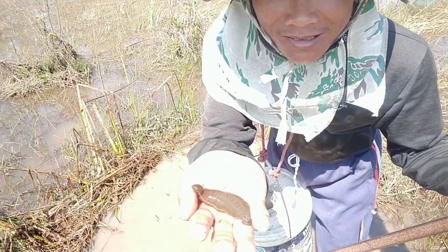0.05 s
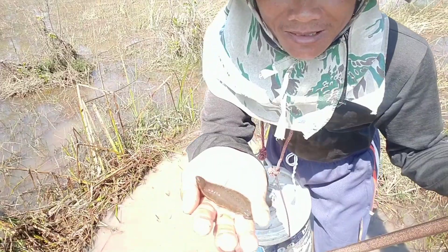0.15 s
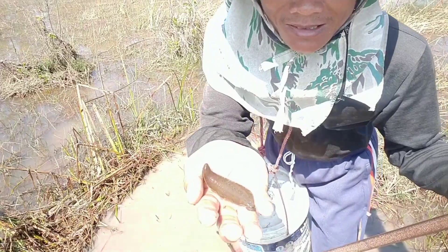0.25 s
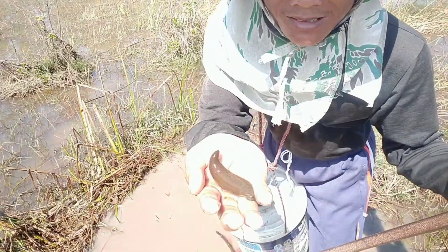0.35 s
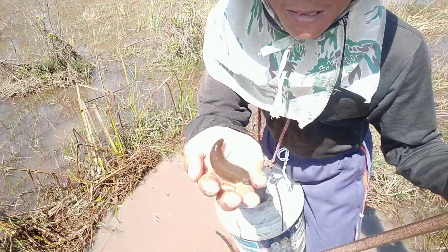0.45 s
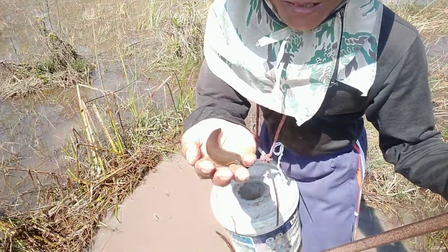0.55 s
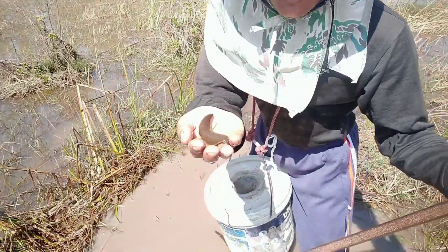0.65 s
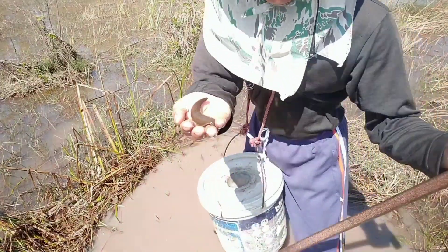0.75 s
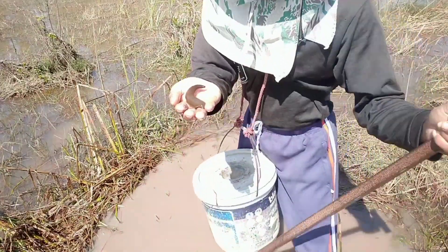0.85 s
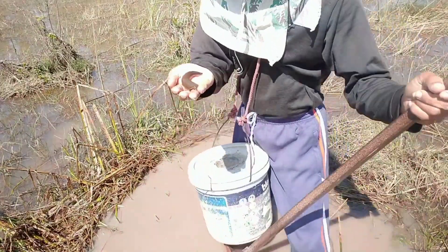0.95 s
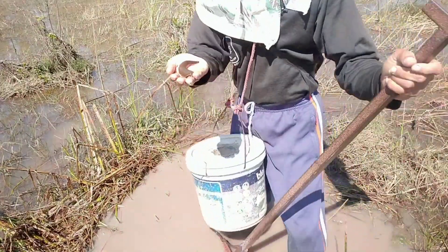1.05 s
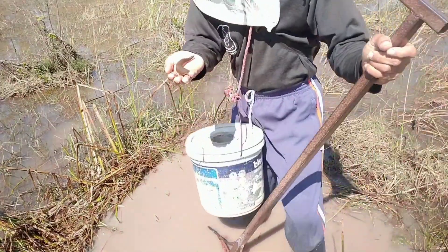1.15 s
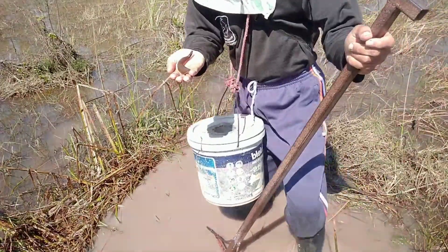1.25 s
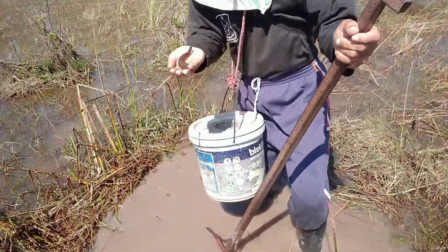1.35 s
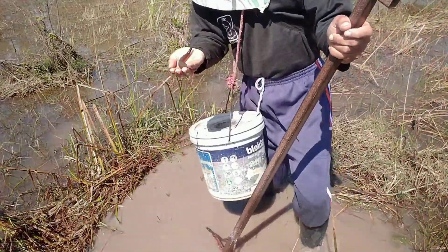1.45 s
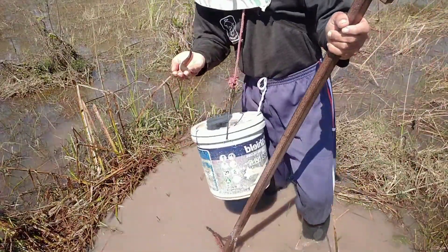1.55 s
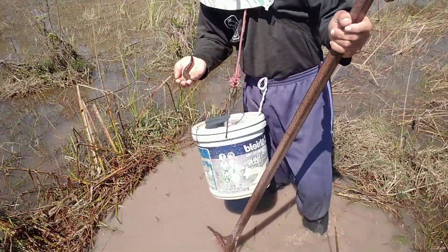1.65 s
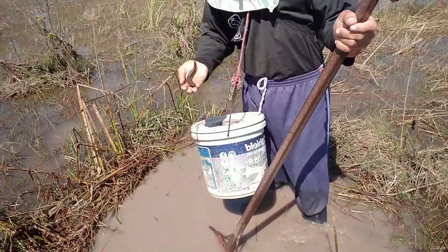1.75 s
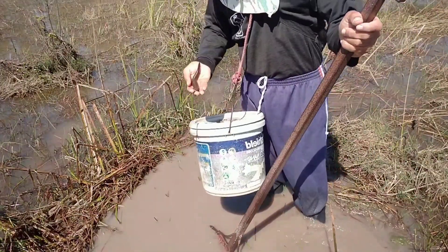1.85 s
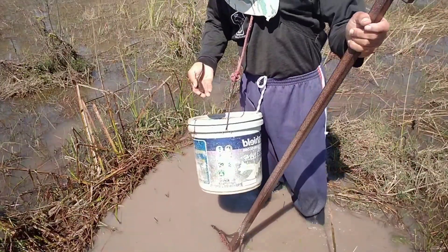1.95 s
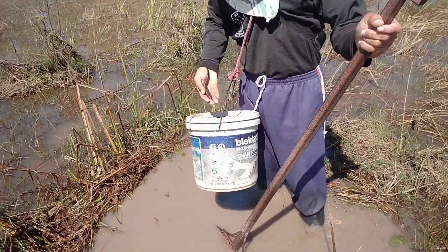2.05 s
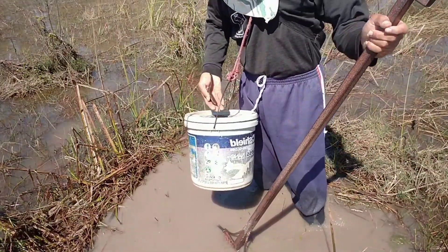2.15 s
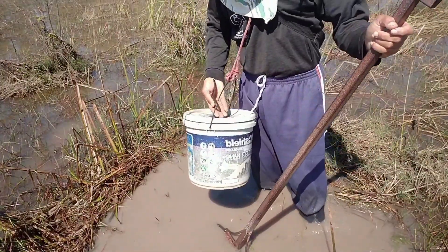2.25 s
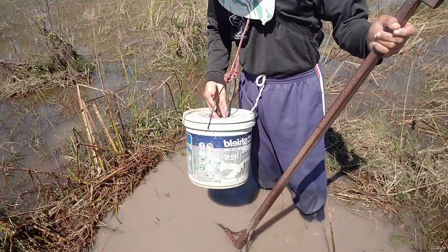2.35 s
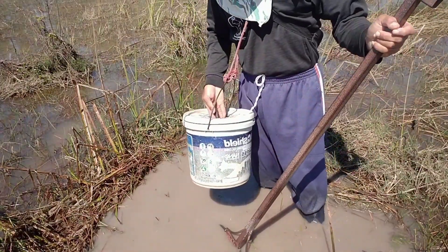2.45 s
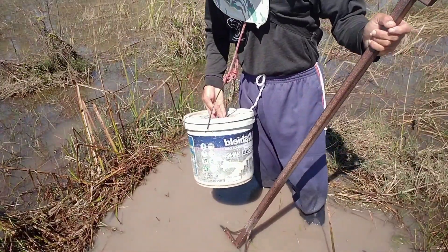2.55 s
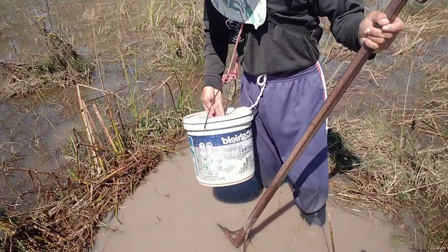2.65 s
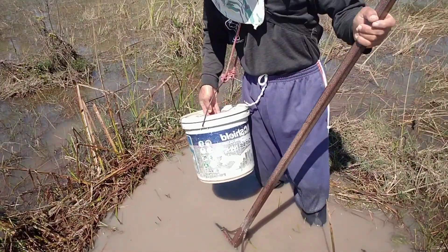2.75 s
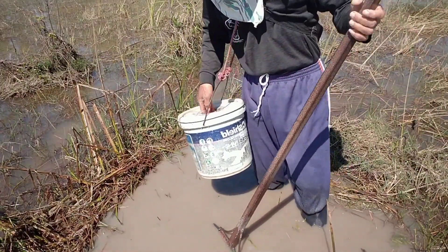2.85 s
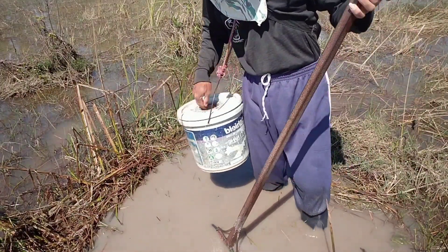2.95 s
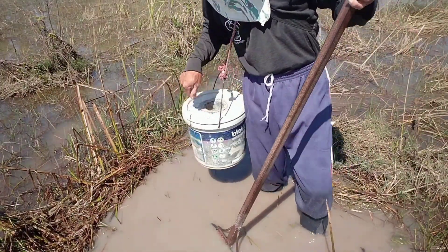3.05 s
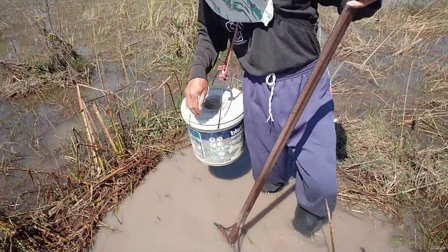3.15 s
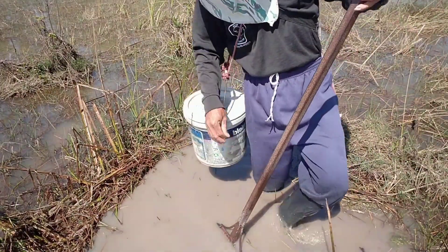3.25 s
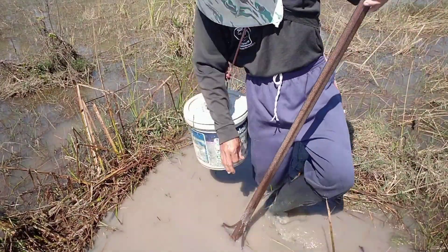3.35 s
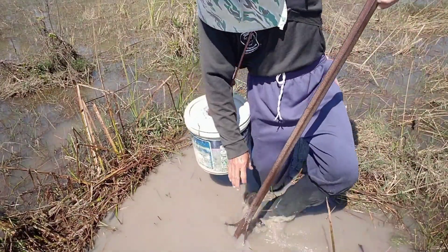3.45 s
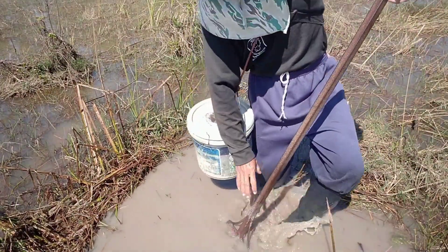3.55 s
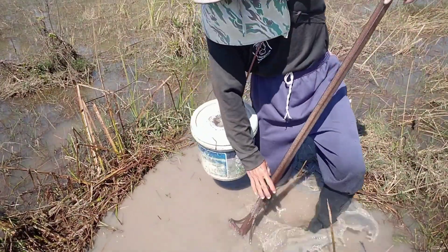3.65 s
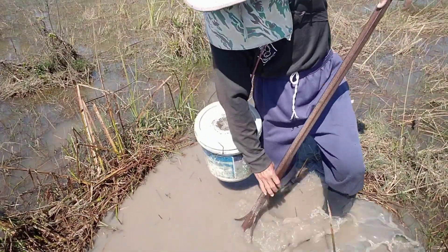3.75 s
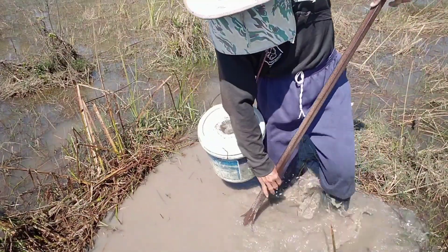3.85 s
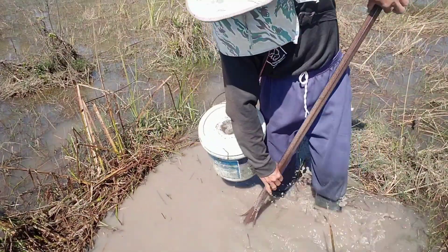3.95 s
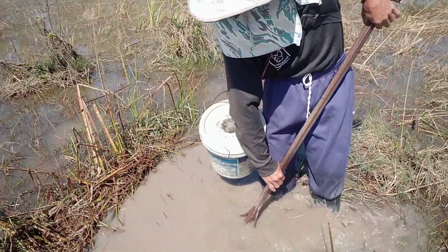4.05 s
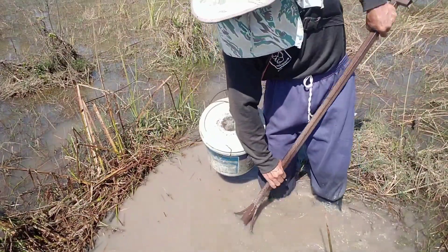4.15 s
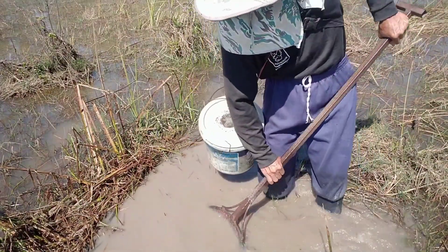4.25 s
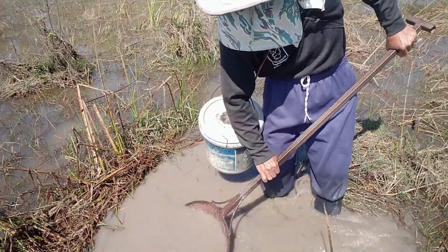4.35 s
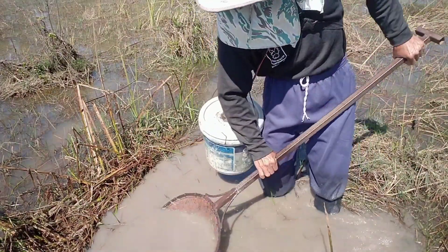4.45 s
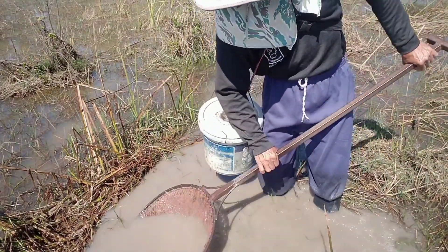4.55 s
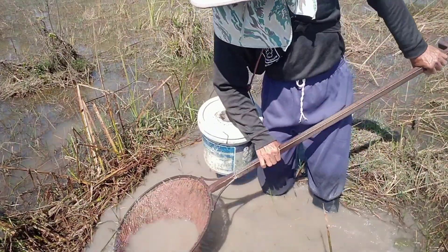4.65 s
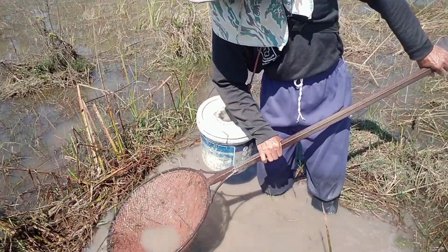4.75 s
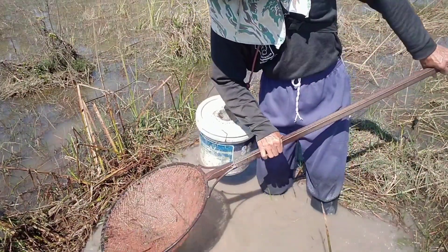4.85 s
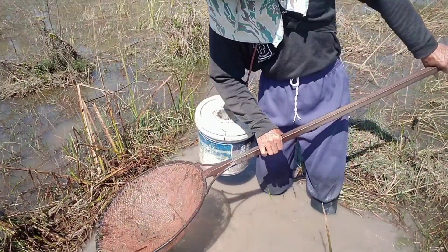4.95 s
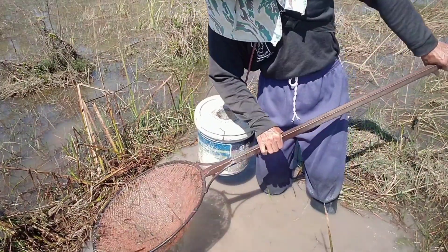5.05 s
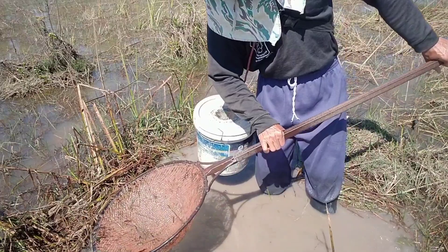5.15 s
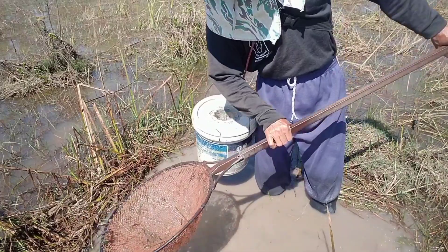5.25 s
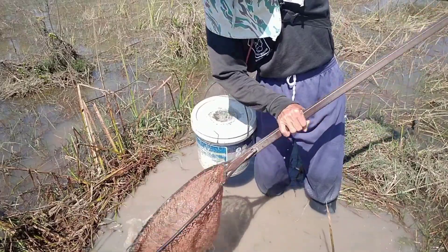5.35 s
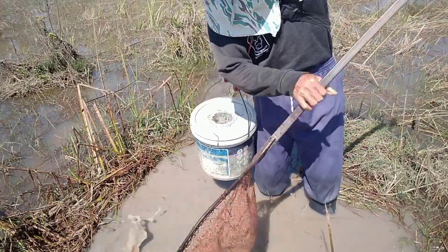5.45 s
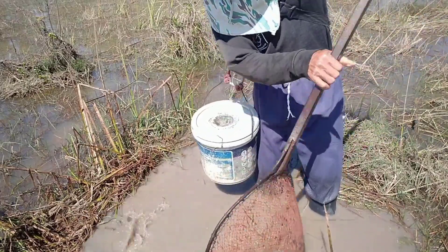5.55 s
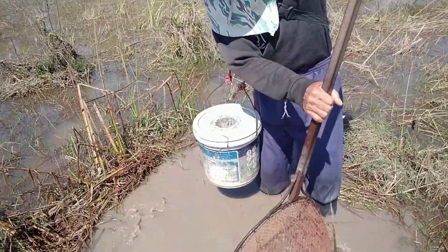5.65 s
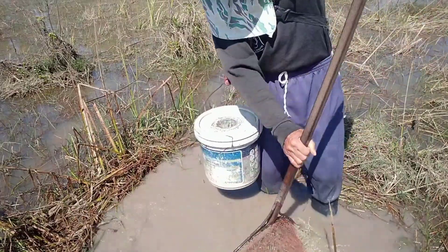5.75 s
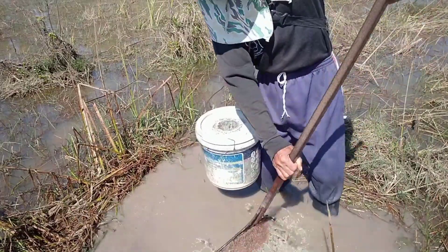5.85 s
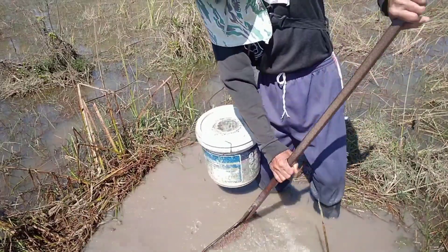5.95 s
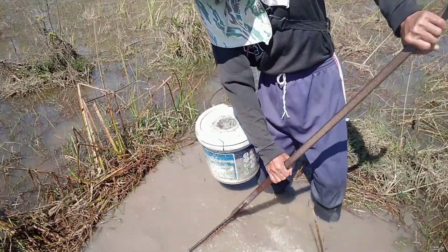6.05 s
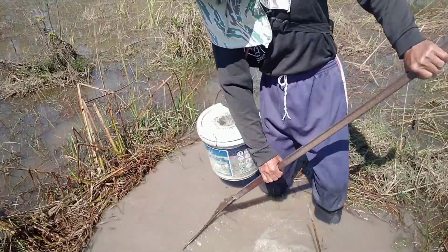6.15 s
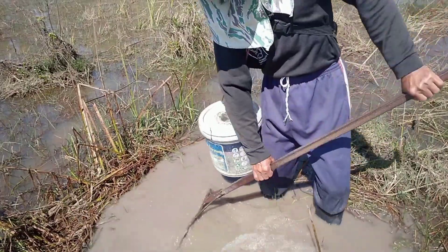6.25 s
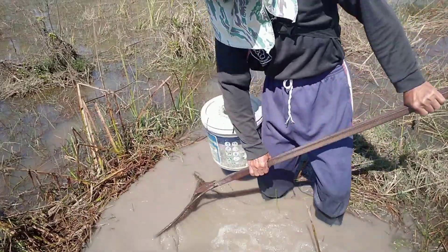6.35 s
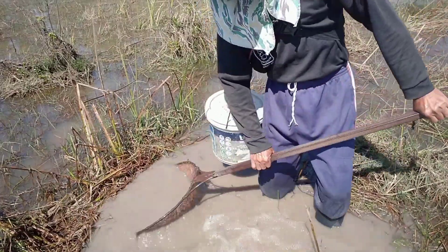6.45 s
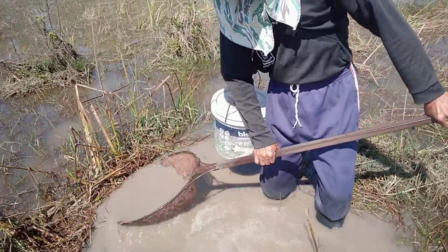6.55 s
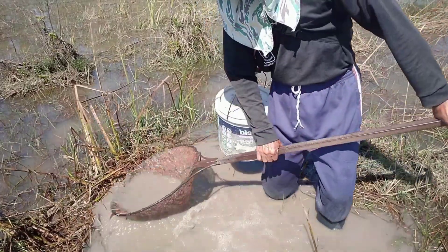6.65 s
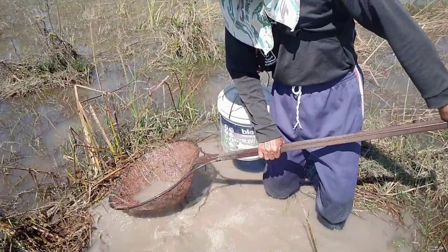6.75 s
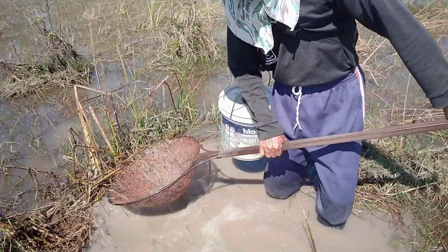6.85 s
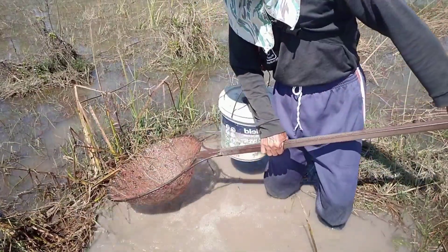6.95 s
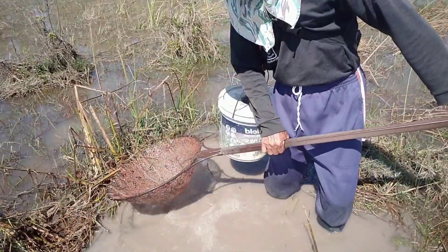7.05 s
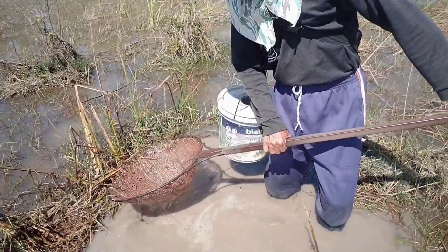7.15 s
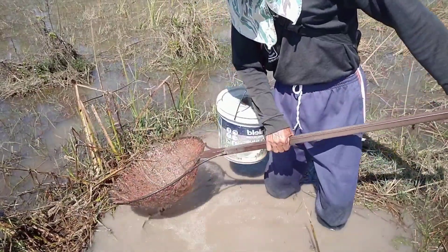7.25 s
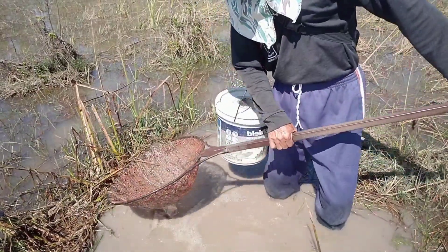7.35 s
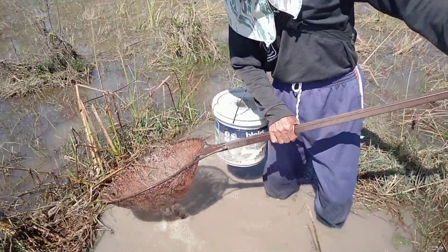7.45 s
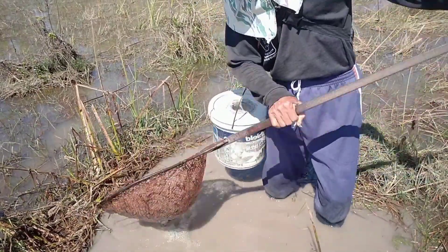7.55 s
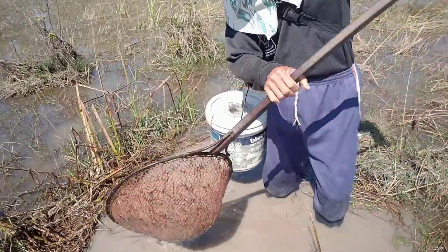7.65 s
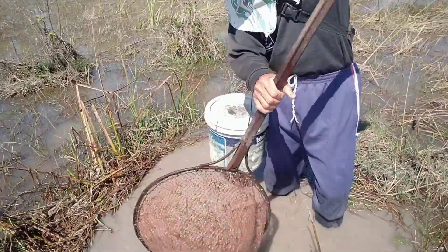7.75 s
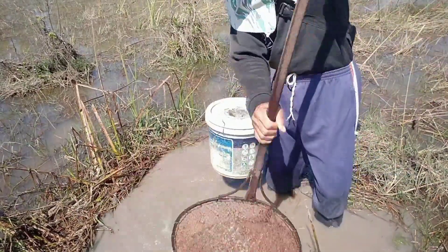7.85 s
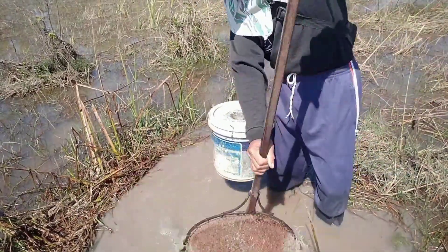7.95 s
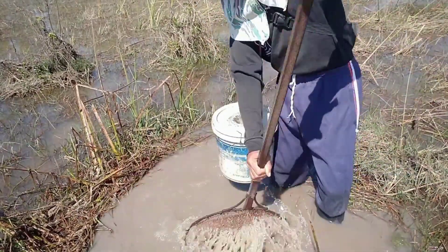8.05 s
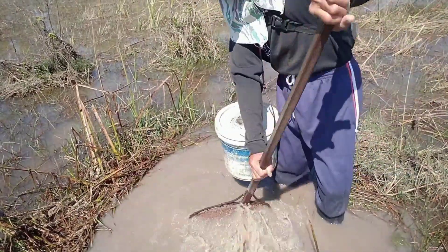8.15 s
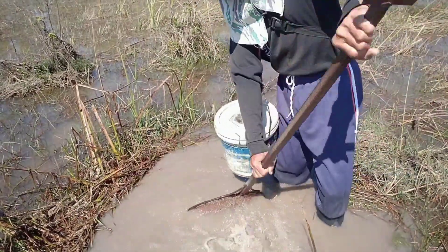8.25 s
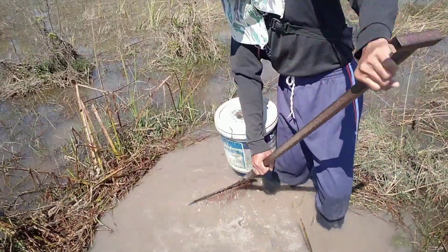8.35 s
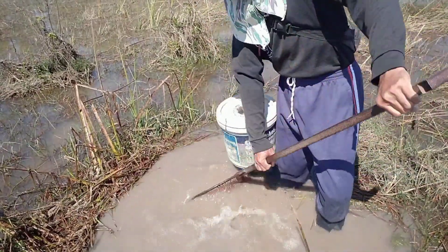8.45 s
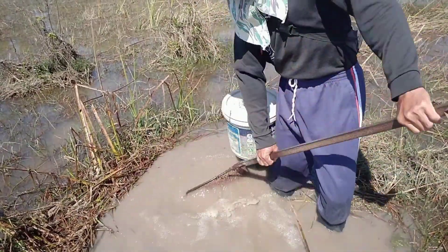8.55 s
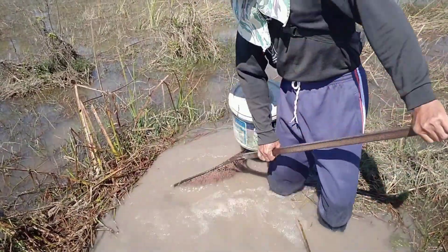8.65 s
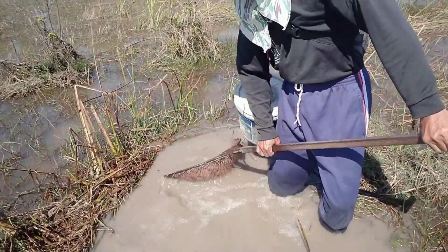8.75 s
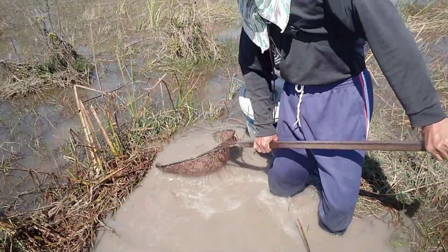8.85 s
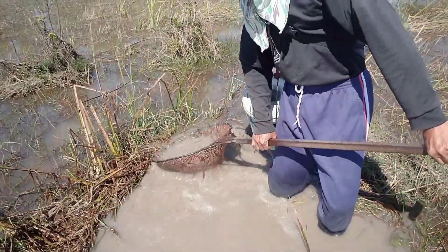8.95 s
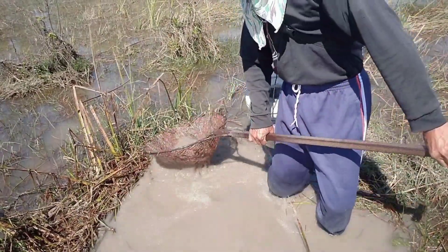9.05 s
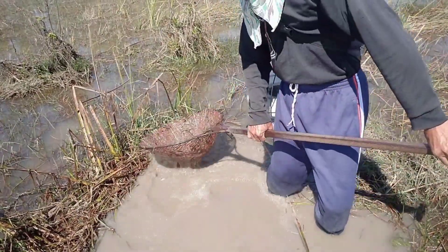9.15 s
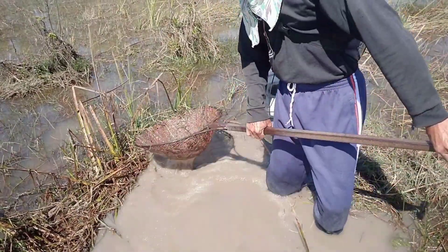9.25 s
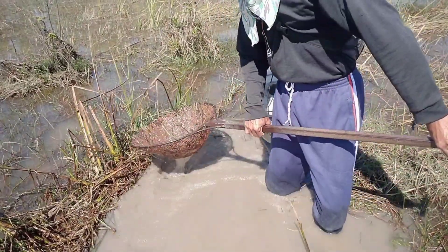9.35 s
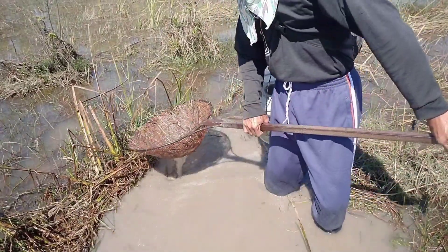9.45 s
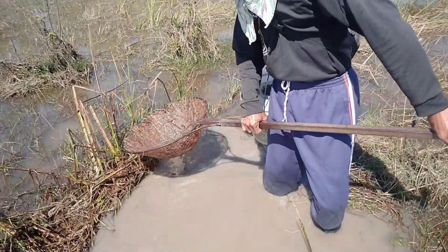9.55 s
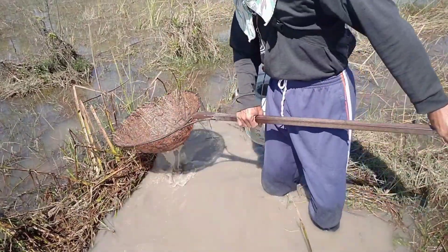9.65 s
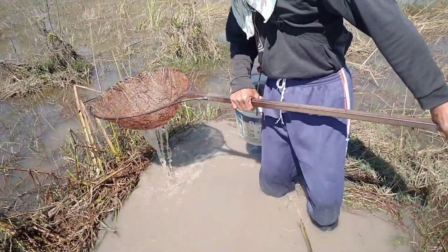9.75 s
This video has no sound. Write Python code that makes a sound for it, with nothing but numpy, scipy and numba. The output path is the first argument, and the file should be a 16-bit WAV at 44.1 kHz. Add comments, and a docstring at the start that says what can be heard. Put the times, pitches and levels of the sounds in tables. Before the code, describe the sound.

A net sweeps through shallow muddy water in forceful bubbly splashes, with plops, drips, a few plastic bucket knocks and wind buffeting the microphone.

```python
"""A person wades in a muddy pond and sweeps a mesh net through it, close to a phone.
Each stir is a swarm of dying sines: bubbles that ring upward, big pockets that glug, spray that patters.
Filtered noise adds froth and hiss; single sines make plops, long singing bubbles and very short high ticks.
A plastic bucket knocks on the hip as a set of damped modes, and its cord rubs in small jerks.
Behind it a far bird chips, a faint whistle sounds twice, wind buffets the microphone and reeds hiss."""
import sys
import numpy as np
from scipy import signal
from scipy.fft import rfft, irfft, next_fast_len
from scipy.io import wavfile
from scipy.ndimage import uniform_filter1d
from numba import njit

SR = 44100
rng = np.random.default_rng(int(sys.argv[2]) if len(sys.argv) > 2 else 0)


def store_pcm(level_fs):
    """Save levels as 16-bit WAV."""
    pcm = np.round(np.clip(level_fs, -1, 1) * 32767).astype(np.int16)
    wavfile.write(sys.argv[1], SR, np.atleast_2d(pcm).T)


N = 431738


def undb(db):
    """Amplitude of a level in dB."""
    return 10 ** (np.asarray(db) / 20)


def colour(table, hz):
    """Level in dB of a spectrum at these frequencies, read along a log pitch axis."""
    f, db = np.transpose(table)
    return np.interp(np.log(np.maximum(hz, 1)), np.log(f), db)


def noise(table):
    """Noise of a given spectrum, rms 1."""
    n = next_fast_len(N)
    gain = undb(colour(table, np.arange(n // 2 + 1) * SR / n))
    x = irfft(rfft(rng.standard_normal(n)) * gain, n)[:N]
    return x / x.std()


def walk(rate):
    """Random level, spread near 1, that slides to a new value `rate` times a second."""
    k = int(SR / rate)
    steps = np.repeat(rng.standard_normal(N // k + 1), k)
    return 1.21 * uniform_filter1d(steps, k)[:N]


@njit
def ring(n, s, hz, t60, size, rise, onset):
    """Sum of dying sines; each climbs in pitch by the share `rise` every half t60 and swells over `onset` s."""
    out = np.zeros(n)
    for k in range(len(s)):
        start, length = int(s[k] * SR), int(t60[k] * SR) + 1
        step, phase = 2 * np.pi * hz[k] / SR, 0.
        level, swell = size[k], 0.
        fade = np.exp(-np.log(1000) / length)
        glide = (1 + rise[k]) ** (2 / length)
        up = 1 - np.exp(-1 / (onset[k] * SR + 1e-9))
        for i in range(start, min(start + length * 5 // 6, n)):  # cut once 50 dB down
            step = min(step * glide, 3.)
            level *= fade
            swell += up * (1 - swell)
            phase += step
            out[i] += swell * level * np.sin(phase)
    return out


# stirs by a leg or the net: (start of hold t/s, rise/s, hold/s, fall/s, bubble level/dB,
# big pocket level/dB above bubbles, spray level/dB above bubbles)
STIRS = [(1.403, 0.089, 0.051, 0.3, -44.5, -8, -14), (1.497, 0.22, 0.11, 0.89, -41.5, -4, -13.5),
         (3.332, 0.11, 0.11, 0.48, -29, -5, -8.5), (3.523, 0.076, 0.46, 0.23, -23.5, -7.5, -10),
         (3.793, 0.02, 0.038, 0.16, -16.5, -14, -8), (3.89, 0.3, 0.33, 0.45, -25.5, -7, -6),
         (5.21, 0.024, 0.033, 1, -27, -25, -5), (5.677, 0.025, 0.069, 0.26, -25, -26, 0.5),
         (5.748, 0.13, 0.24, 0.15, -11, -7.5, -5), (6.05, .1, 0.037, 0.45, -28, -4, -15),
         (7.266, 0.36, 0.34, 0.7, -34.5, -11, -4.5), (7.956, 0.14, 0.15, 0.18, -10.5, -7, -3.5),
         (8.153, 0.068, 0.093, 0.22, -13.5, -9.5, -5.5), (8.439, 0.13, 0.052, 0.59, -28.5, -10, -4),
         (8.686, 0.56, .03, 0.29, -38.5, -2.5, -3), (9.511, 0.22, 0.11, 1, -29.5, -37, -6)]
# water draining from legs and net between the stirs: (t/s, bubble level/dB, spray level/dB above bubbles)
TRICKLE = [(1.3, -77, 10), (1.75, -69, 8.5), (2.5, -69.5, 2.5), (3.25, -50, -3.5), (4.3, -56, 5),
           (4.57, -44, 0), (5.14, -40, -4.5), (5.6, -48, 6.5), (6.15, -37.5, -3.5), (6.8, -37, -5.5),
           (7.17, -48, 4.5), (7.8, -53, 10), (8.6, -39.5, -2.5), (9.27, -41, -1), (9.79, -38.5, -1)]
SLOPE_DB, CROWN_DB = 32, 4  # climbed in the rise and lost in the fall; arch over the hold


def stirring(above_db, lag_s, trickle_db):
    """Level in dB of one size range: every stir rises, arches and falls over the trickle."""
    t = np.arange(0, N + 64, 64) / SR
    power = undb(2 * np.interp(t, np.transpose(TRICKLE)[0], trickle_db, left=-120))
    for (s, rise, hold, fall, db, *_), up_db in zip(STIRS, above_db):
        since = t - s - lag_s
        arch = CROWN_DB * np.clip(2 * since / hold - 1, -1, 1) ** 2
        flanks = SLOPE_DB * (np.maximum(-since, 0) / rise + np.maximum(since - hold, 0) / fall)
        power = power + undb(2 * (db + up_db - arch - flanks))
    return np.interp(np.arange(N) / SR, t, 10 * np.log10(power))


# lone plops and drips: (t/s, level/dB, f/Hz, spray level/dB above the plop)
PLOPS = [(1.316, -37, 2180, -27), (1.332, -35, 1540, -20), (1.382, -28.5, 1610, -24),
         (1.384, -27.5, 2950, -23), (1.424, -25, 2270, -17), (1.437, -35, 1920, -23),
         (1.453, -28, 2640, -36), (1.54, -29.5, 1830, -9.5), (1.598, -32, 2000, -23),
         (1.674, -31.5, 1750, -19), (1.763, -34, 2860, -21), (3.028, -36.5, 670, -12),
         (3.281, -25, 1930, -29), (3.308, -14, 1040, -27), (3.341, -21.5, 480, -8), (3.381, -20, 380, -16),
         (3.436, -22.5, 1190, -7), (3.512, -18.5, 1050, -14), (3.534, -11, 2670, -14),
         (3.641, -14, 754, -8), (3.654, -17.5, 646, -22), (3.698, -11.5, 468, -14), (3.727, -7, 883, -16),
         (3.788, -2, 938, -21), (3.797, -3.5, 2340, -12), (3.809, -4.5, 1850, -7.5), (3.935, -4, 1930, -20),
         (3.96, -10, 1670, -17), (3.981, -13, 582, -27), (4.04, -16, 1034, -9), (4.14, -12, 1710, -30),
         (4.182, -14, 2850, -18), (4.21, -17.5, 2430, -6), (4.273, -17, 1680, -23),
         (4.29, -23.5, 1310, -18), (4.805, -23, 2140, -19), (5.208, -16, 1690, -33),
         (5.234, -17.5, 1470, -3.5), (5.255, -15, 545, -6.5), (5.294, -11.5, 1750, -10.5),
         (5.352, -16, 1700, -9), (5.423, -13, 2820, -10.5), (5.463, -24.5, 1100, -6),
         (5.515, -11.5, 2150, -31), (5.577, -16, 1700, -7.5), (5.592, -5.5, 1390, -12.5),
         (5.603, -10, 2110, -27), (5.659, -27, 2230, -10), (5.95, -8.5, 1370, -22), (6.044, -15, 611, -25),
         (6.186, -21.5, 1700, -7), (6.237, -19, 1280, -23), (6.558, -30, 845, -25),
         (6.876, -20.5, 1420, -28), (7.098, -28, 1450, -20), (7.267, -16, 2040, -9),
         (7.292, -18, 2770, -12), (7.388, -18.5, 2650, -25), (7.476, -17, 1880, -1.5),
         (7.59, -25, 3230, -8), (7.637, -22.5, 2250, -4), (7.66, -24, 1880, -2.5), (7.715, -24, 2480, -17),
         (7.919, -9.5, 1920, -8), (8.041, -2.5, 1430, -18), (8.178, -5, 636, -9), (8.213, -1.5, 1150, -14),
         (8.283, -6, 1355, -22), (8.456, -24.5, 447, -20), (8.478, -19, 1850, -17.5),
         (8.682, -21.5, 1460, -15), (8.726, -21.5, 1030, -23), (9.392, -25, 2170, -24),
         (9.544, -14.5, 4170, -23), (9.575, -20, 2100, -20), (9.6, -17, 1900, -20), (9.627, -8, 1550, -20),
         (9.665, -25, 805, -20), (9.7, -17.5, 2350, -8)]


def splats(db, t60):
    """Power that every plop adds to the stir: sudden, then dying away."""
    kicks = np.zeros(N)
    np.add.at(kicks, (np.transpose(PLOPS)[0] * SR).astype(int), undb(2 * db))
    return signal.lfilter([1], [1, -np.exp(-2 * np.log(1000) / (t60 * SR))], kicks)


def plops():
    """Each plop glides up as its cavity closes, small ones dying sooner, with a higher slap as the drop lands."""
    s, db, hz, _ = np.transpose(PLOPS)
    t60 = 0.031 * (1500 / hz) ** 0.4
    rise = 0.28 * rng.random(len(s)) ** 2
    cavity = ring(N, s, hz * .94, t60, undb(db), rise, 0.96 / hz)
    slap_hz = hz * (1.58 + 0.48 * rng.random(len(s)))
    return cavity + ring(N, s, slap_hz, 9 / hz, undb(db - 4.5), 0 * s, 0.9 / hz)


# colour of the grains: (f/Hz, level/dB per Hz)
FROTH = [(150, -17.5), (249, -13.5), (406, -12), (580, -10), (1310, -2.5), (2650, -5), (5680, -18.5),
         (8230, -11), (10800, -16), (14800, -12.5), (16000, -44)]


def swarm(db, kind, calm=0.049, full_db=-20, span_db=28, tilt_db=np.zeros(N)):
    """Random bubbles of one size range: the harder the stir, the more of them; many small, few large."""
    lo_hz, hi_hz, cycles, rise, most, scatter_db = kind
    u = rng.random((int(most * N / SR), 6)).T
    s = u[0] * (N - 1) / SR
    at = (s * SR).astype(int)
    here_db = db[at]
    share = calm + (1 - calm) * np.clip(1.5 + (here_db - full_db) / span_db, 0, 1) ** 2
    keep = (u[1] < share) & (here_db > -90)
    hz = lo_hz * (min(hi_hz, 17000) / lo_hz) ** u[2]
    t60 = cycles * (0.41 + 1.64 * u[3]) / hz
    spread_db = -scatter_db * np.log(1 - np.minimum(.99 * u[4], .999))
    size = undb(colour(FROTH, hz) + spread_db) * np.sqrt(hz / t60)
    power = most * np.mean(size ** 2 * t60) / (4 * np.log(1000))  # of the whole swarm before its level is set
    here_db = here_db + tilt_db[at] * np.log2(hz / np.sqrt(lo_hz * hi_hz))  # tilt in dB per octave
    size = size * undb(here_db) / np.sqrt(power * share)
    climb = rise * 2 * u[5]
    return ring(N, s[keep], hz[keep], t60[keep], size[keep], climb[keep], (0.59 / hz)[keep])


# size ranges of ringing air: (lowest f/Hz, highest f/Hz, cycles to die before scatter,
# mean share of pitch rise, most grains a second, size scatter level/dB)
POCKETS = (150, 650, 16, .2, 200, 3.5)
BUBBLES = (550, 4500, 28, .22, 1500, 3.0)
SPRAY = (4500, 16000, 24, .1, 4000, 4.5)
SPRAY_LEAD_S, SWEEP_LAG_S, POCKET_LAG_S = 0.011, 0.025, 0.027  # spray flies first, big pockets surface last
TRICKLE_POCKET_DB = -10  # big pockets in the trickle, above its bubbles


def water():
    """Bubbles clump as sheets of water collapse; each plop throws up a burst of its own; spray also hisses."""
    *_, pocket_db, spray_db = np.transpose(STIRS)
    _, db, drip_spray_db = np.transpose(TRICKLE)
    bubbly = stirring(0 * pocket_db, 0, db)
    deep = stirring(pocket_db, POCKET_LAG_S, db + TRICKLE_POCKET_DB)
    fine = stirring(spray_db, -SPRAY_LEAD_S, db + drip_spray_db)

    # small bubbles ring first, larger ones as the water closes: a stir sweeps down in pitch
    sweep = np.clip(0.15 * (bubbly - stirring(0 * pocket_db, SWEEP_LAG_S, db)), -7, 7)
    rush = np.clip((bubbly + 24) / 8, 0, 1)  # a plunge of the whole net fuses the clumps into one fine rush
    stir = np.clip((bubbly + 44) / 10, .15, 1)  # a calm trickle runs evenly
    clump = (2.93 * stir - 0.77 * rush) * walk(45)

    _, db, _, spray_db = np.transpose(PLOPS)
    churn = 10 * np.log10(undb(2 * (bubbly + clump)) + splats(db - 8.5, t60=0.03))
    patter = fine + 1.27 * clump + 0.7 * walk(70)
    bursts = uniform_filter1d(splats(db + spray_db, t60=0.052), size=150)
    mist = 10 * np.log10(undb(2 * patter) + bursts)

    tilt_db = 0.5 * (bubbly - deep - 13.5) + sweep  # with few big pockets the bubbles are small too
    bubbles = swarm(churn - 5 + 4 * stir - 1.8 * rush, BUBBLES, calm=0.32, tilt_db=tilt_db)
    pockets = swarm(deep + 1.7 * walk(25) - 3.5 - 3 * rush, POCKETS, full_db=-27.5)
    spray = swarm(mist - 4, SPRAY, calm=0.16, full_db=-21)

    low = noise([(130, -28), (800, 4.0), (1500, 5.5), (2500, -12.5)])
    high = noise([(900, -7.5), (2200, 8.0), (4000, -6.0), (6000, -31)])
    froth = 0.5 * low * undb(-1.5 * sweep) + 0.79 * high * undb(sweep)
    froth = froth * undb(churn - 5.5 - 6.9 * stir + 7.2 * rush)
    hiss = noise([(3000, -2.5), (5000, -0.5), (6200, -6.5), (8200, 3.0), (10500, -9.0), (15500, 8.0)])
    return bubbles + pockets + spray + froth + hiss * undb(mist)


# long bubbles that sing on: (t/s, level/dB, start f/Hz, t60/s, share of pitch rise every half t60)
SINGERS = [(1.429, -35, 464, 0.077, .05), (1.493, -21, 1064, 0.042, 0.32), (1.53, -30, 370, 0.106, .05),
           (1.552, -24, 712, 0.068, .038), (1.741, -26.5, 790, 0.05, 1.7), (3.701, -22, 240, 0.19, 0.074),
           (3.918, -11.5, 208, 0.091, 0.072), (4.368, -19.5, 638, 0.16, 1.5),
           (4.401, -14.5, 983, 0.046, 1.4), (4.485, -21, 914, 0.039, 0.14),
           (4.617, -22.5, 1750, 0.042, 0.64), (6.36, -24.5, 520, 0.048, .1)]


def singers():
    """Long bubbles that swell, then ring on while their pitch climbs."""
    s, db, hz, t60, rise = np.transpose(SINGERS)
    return ring(N, s, hz, t60, undb(db), rise, 0.12 * t60)


# very short high ticks: (t/s, level/dB, f/Hz)
TICKS = [(1.5105, -31, 8200), (1.37, -39, 6400), (1.727, -22, 8750), (2.0103, -33, 8200),
         (2.011, -26, 14300), (4.0263, -13, 7800), (4.1116, -14, 6900), (4.2175, -16, 14800),
         (4.3101, -12, 14500), (6.223, -10, 14500), (6.843, -19, 7500), (6.965, -20.5, 7440),
         (7.263, -7, 14800), (5.0735, -17, 7950), (7.86, -13, 8140)]


def ticks():
    """Very short high sines at a steady pitch, with a decay rate of 60 dB in 40 cycles."""
    s, db, hz = np.transpose(TICKS)
    return ring(N, s, hz, 40 / hz, undb(db), 0 * s, 0.68 / hz)


# blows on the bucket: (t/s, level/dB, hardness: 0 dull, 1 firm, 3 a sharp tick,
# pitch share: multiplies the mode pitches, below 1 lower and faster damped, above 1 higher and longer)
KNOCKS = [(.626, -22.5, 1.64, 0.96), (0.645, -30, 1.3, 1.06), (.748, -20, 1.6, .95),
          (0.765, -29.5, 1.5, 1.22), (0.78, -24, 0.44, 1.13), (2.768, -23.5, 0.22, 0.9),
          (2.834, -29.5, 0.1, 0.9), (2.899, -72.5, 4.54, 0.97), (8.531, -10.5, 0.74, 1.04)]
# cord dragging over the rim: (start t/s, length/s, level/dB)
RUBS = [(0.472, 0.056, -53.5), (0.534, 0.033, -47.5), (0.799, 0.096, -44), (0.852, 0.047, -42.5)]
# modes of the bucket at pitch share 1: (f/Hz, level/dB, t60/s)
BUCKET = [(143, -3, 0.14), (219, -1, 0.034), (405, -7, .022), (560, 3, 0.011), (790, 6.5, 0.041),
          (1130, 10.5, 0.021), (1520, 9.5, 0.021), (2040, 1.5, 0.014), (2570, -4, 0.023),
          (3380, 0.5, 0.016)]


def bucket():
    """Hard blows reach the upper modes, pitch share scales pitch and ring; the cord slips in small jerks."""
    blows = list(KNOCKS)
    for s, length, db in RUBS:
        blows += [(s + length * u, db + 8 * (v - .5), 1.6, 1) for u, v in rng.random((16, 2))]
    low = BUCKET[0][0]
    modes = BUCKET[:1] + 3 * BUCKET[1:]  # each upper mode is a cluster of three
    rows = []
    for s, db, hard, pitch_share in blows:
        for hz, mode_db, t60 in modes:
            upper = hz > low
            pitch = hz * pitch_share * rng.normal(1, 0.018 + .11 * upper)
            dull_db = 4.6 * (2.5 - hard) * np.log2(hz / low)
            sign = rng.choice([1, 1 - 2 * (hz > 2 * low)])  # random above an octave over the lowest mode
            size = -undb(db + mode_db - 5.4 * upper - dull_db) * sign
            rows.append((s, pitch, t60 * pitch_share ** 1.9, size, 0, .0004))
    return ring(N, *np.array(rows).T.copy())


# far bird: (t/s, level/dB, f/Hz)
CHIPS = [(1.025, -54.5, 3800), (2.255, -54, 4800), (2.495, -55.5, 4800), (2.785, -51.5, 4800)]


def bird():
    """Short scratchy chips: brief swells of noise banded around a pitch."""
    t, out = np.arange(N) / SR, 0
    for s, db, hz in CHIPS:
        shape = np.exp(-((t - s - .012) / 0.014) ** 2)
        scratch = noise([(hz / 4.5, -30), (hz / 2.0, -5), (hz, 0), (hz * 1.17, -6), (hz * 3.1, -30)])
        out = out + undb(db) * shape * scratch
    return out


# faint whistle far off: (start t/s, length/s, level/dB, f/Hz)
WHISTLES = [(4.425, .13, -44, 1135), (7.71, 0.19, -47, 1197)]


def whistle():
    """A soft sine that slides up onto its note and wavers slightly."""
    t, out = np.arange(N) / SR, 0
    waver = 1 + 0.012 * walk(30)
    for s, length, db, hz in WHISTLES:
        shape = np.clip(np.minimum(t - s, s + length - t) / 0.025, 0, 1)
        slide = 1 - 0.112 * np.exp(-np.abs(t - s) / 0.0147)
        out = out + undb(db) * shape * np.sin(2 * np.pi * hz * np.cumsum(slide * waver) / SR)
    return out


# steady wind on the microphone: (t/s, level/dB)
WIND = [(0, -45), (2.4, -46.5), (3.0, -43.5), (4.5, -39), (5.4, -39), (6.5, -36), (8.1, -39), (9.0, -35),
        (9.79, -37.5)]
# gusts on top of it: (t/s, level/dB, half length/s)
GUSTS = [(0.268, -40.5, 0.11), (.78, -38, 0.14), (6.21, -28, 0.29), (6.829, -17.5, 0.042), (7.3, -29, 0.34),
         (7.87, -28.5, 0.063)]
# colour of the wind: (f/Hz, level/dB per Hz)
GUST = [(15, 8), (25, 3), (45, 0.5), (70, -1), (110, -13.5), (180, -23), (300, -45)]
# single buffets that thump the microphone: (t/s, level/dB, f/Hz)
THUMPS = [(.208, -30, 38), (.342, -25, 48), (6.269, -18.5, 45), (6.376, -20, 40.3), (6.836, -16, 36.2),
          (6.892, -23, 40), (7.233, -18.5, 40), (7.42, -20, 39.6), (8.726, -21, 50.3)]


def wind():
    """Low noise swells in gusts and flutters; each buffet is a short low pulse."""
    t = np.arange(N) / SR
    power = undb(2 * np.interp(t, *np.transpose(WIND)))
    for s, db, half in GUSTS:
        power = power + undb(2 * db) * np.exp(-((t - s) / half) ** 2)
    out = noise(GUST) * np.sqrt(power) * undb(3.07 * walk(40))
    for s, db, hz in THUMPS:
        pulse = np.exp(-((t - s) * hz / 0.62) ** 2) * np.cos(2 * np.pi * hz * (t - s))
        out = out + undb(db) * pulse
    return out


# colour of the reeds and distance: (f/Hz, level/dB per Hz)
MARSH = [(100, -7), (167, -13.5), (284, -18.5), (660, -23.5), (2710, -25), (2950, -29), (6220, -41.5),
         (14900, -37)]
MARSH_DB = -56


def marsh():
    """Faint hiss of reeds and distance, its level drifting slowly."""
    return noise([(60, -26)] + list(MARSH)) * undb(MARSH_DB + 1.0 * walk(2.97))


def scene():
    """Sum of all sources, one channel."""
    pond = water() + plops() + singers() + ticks()
    return (pond + bucket() + bird() + whistle() + wind() + marsh())[None]


TOP_HZ = 15500


def record(dry):
    """The phone rounds the loudest peaks and cuts the top."""
    rounded = np.tanh(1.1 * dry) / .95
    return signal.sosfilt(signal.ellip(12, .3, 80, TOP_HZ, fs=SR, output="sos"), rounded)


dry = scene()
out = record(dry)
store_pcm(out)
```